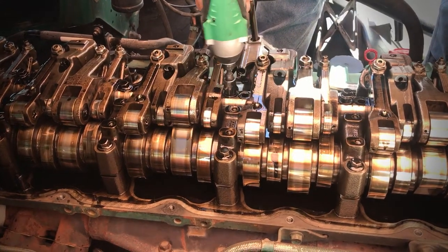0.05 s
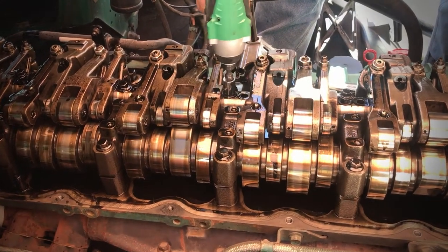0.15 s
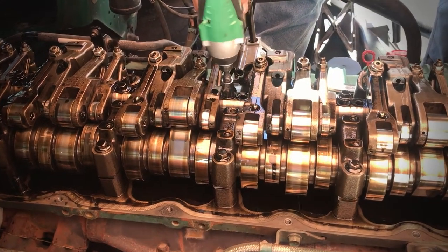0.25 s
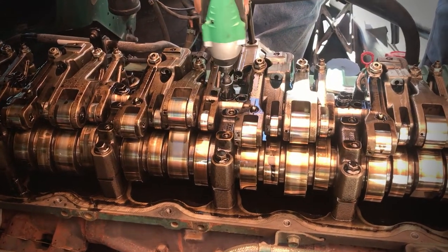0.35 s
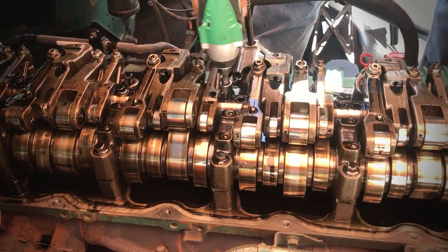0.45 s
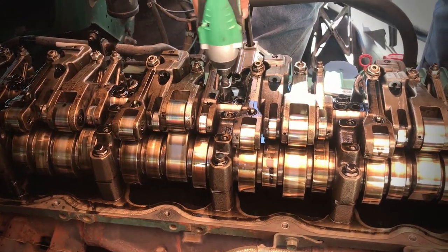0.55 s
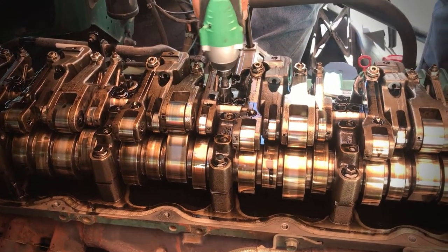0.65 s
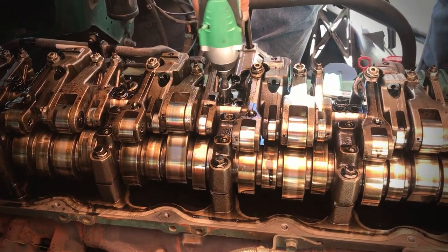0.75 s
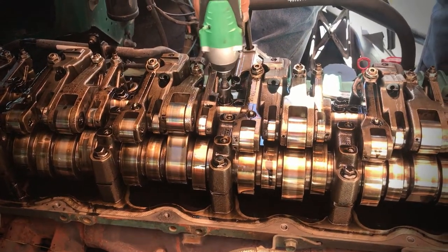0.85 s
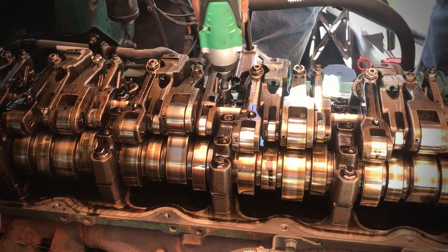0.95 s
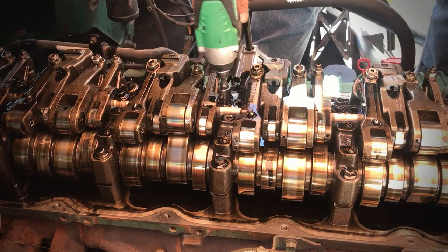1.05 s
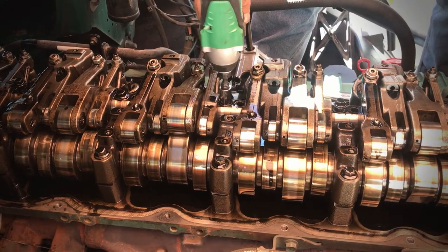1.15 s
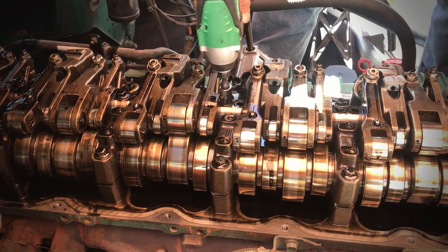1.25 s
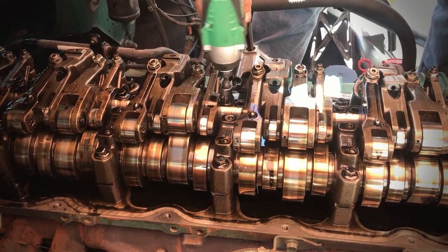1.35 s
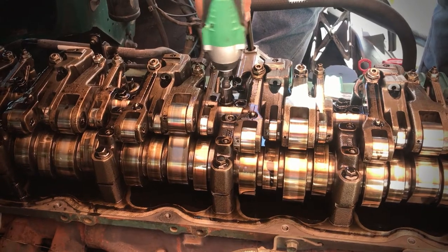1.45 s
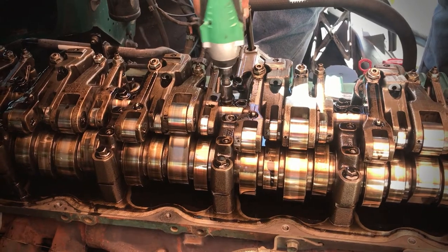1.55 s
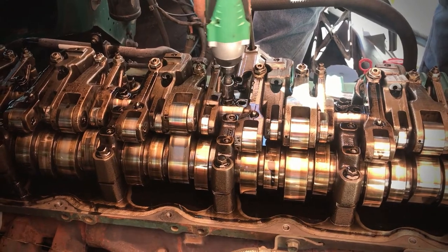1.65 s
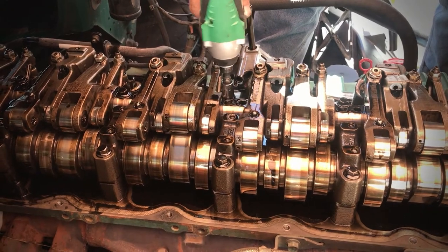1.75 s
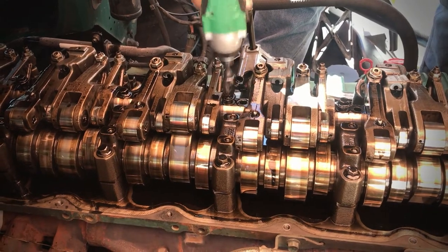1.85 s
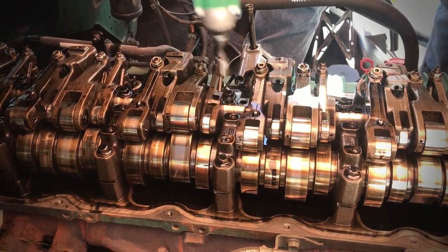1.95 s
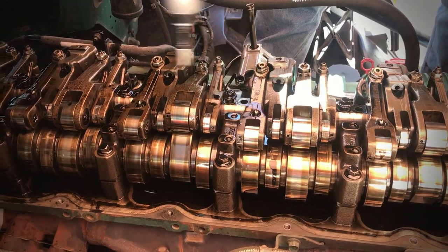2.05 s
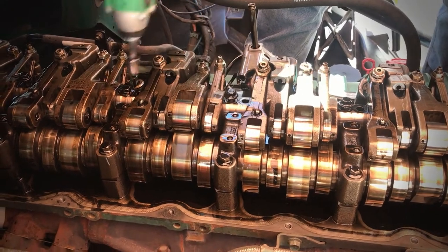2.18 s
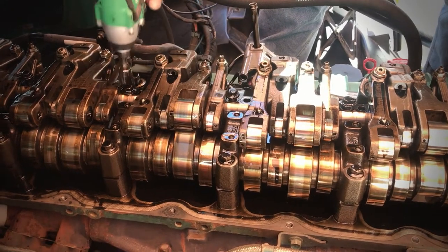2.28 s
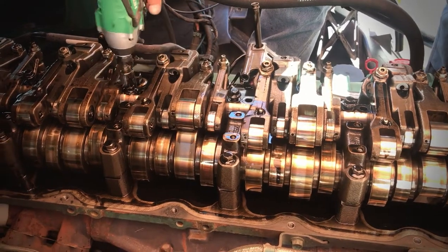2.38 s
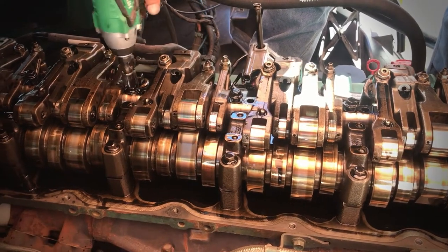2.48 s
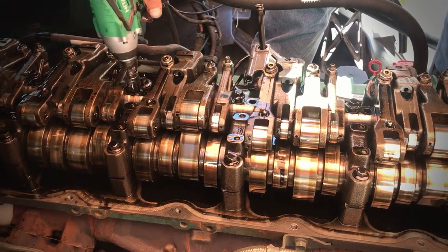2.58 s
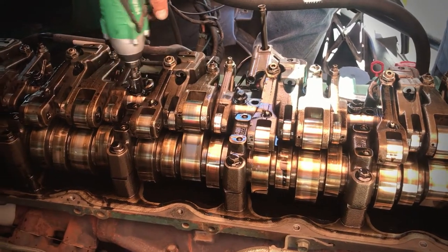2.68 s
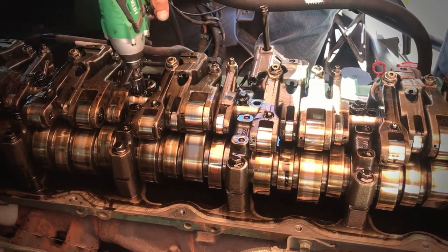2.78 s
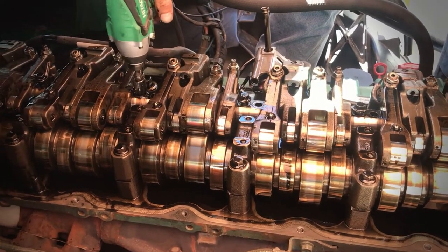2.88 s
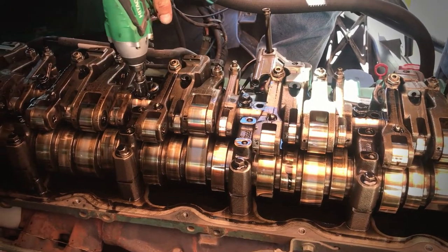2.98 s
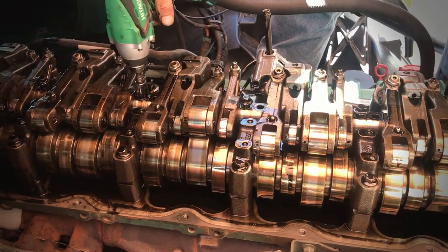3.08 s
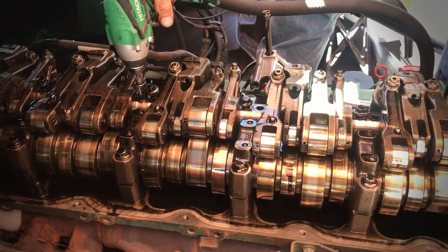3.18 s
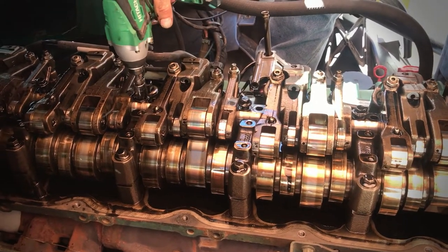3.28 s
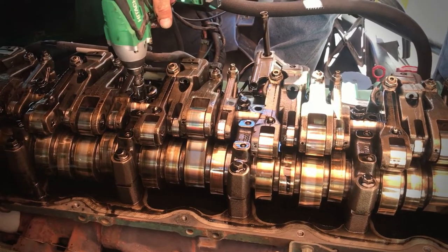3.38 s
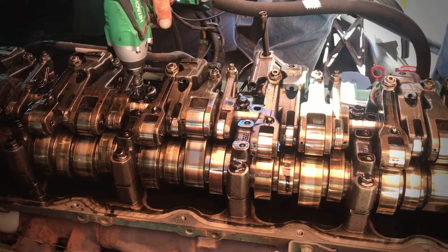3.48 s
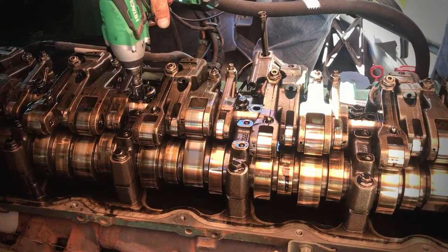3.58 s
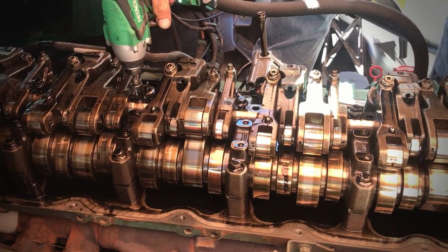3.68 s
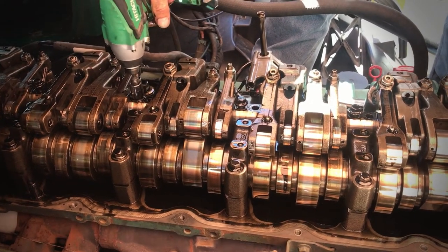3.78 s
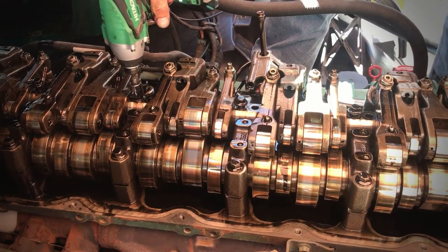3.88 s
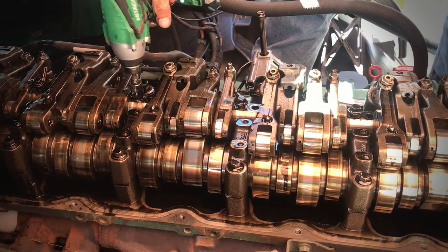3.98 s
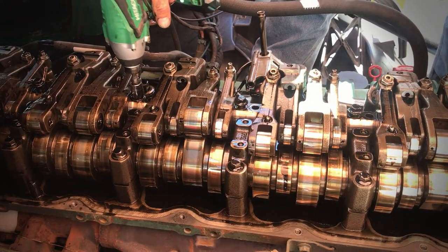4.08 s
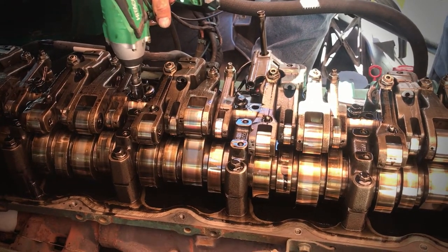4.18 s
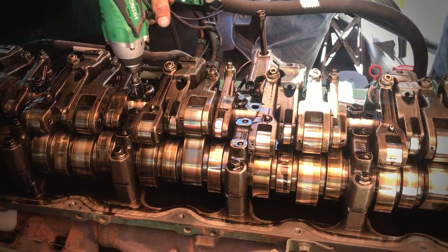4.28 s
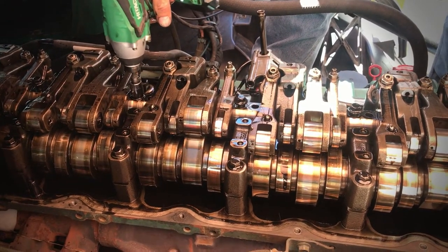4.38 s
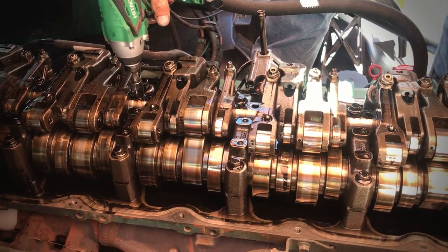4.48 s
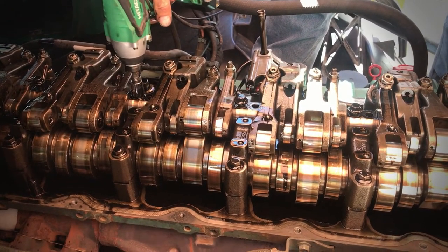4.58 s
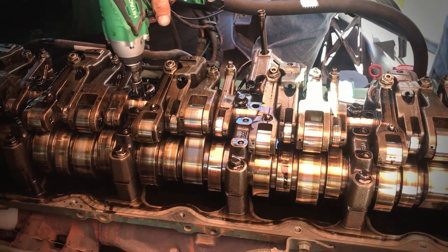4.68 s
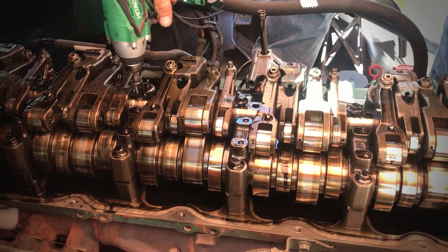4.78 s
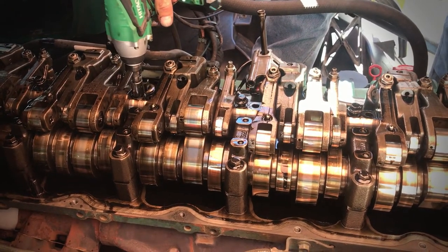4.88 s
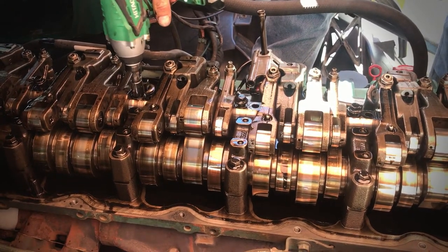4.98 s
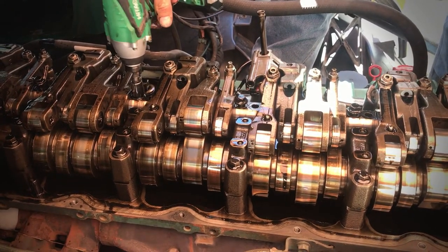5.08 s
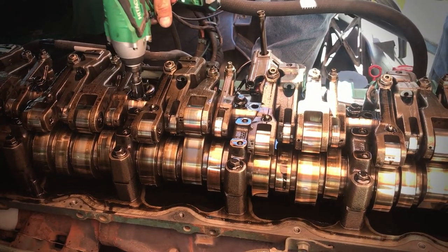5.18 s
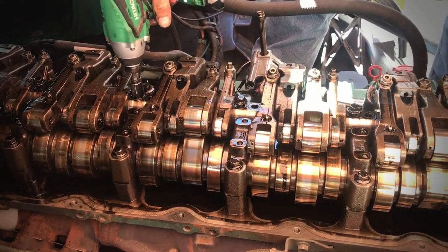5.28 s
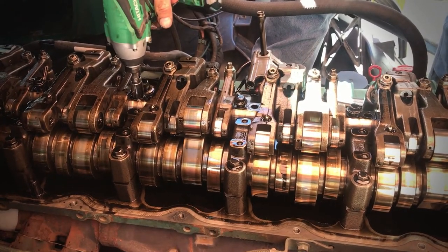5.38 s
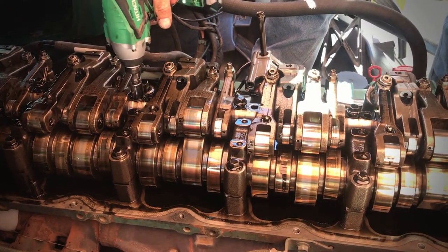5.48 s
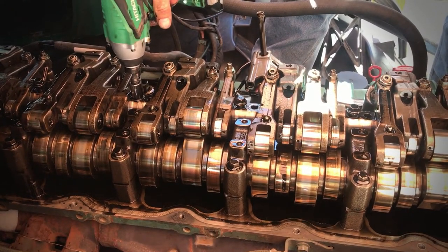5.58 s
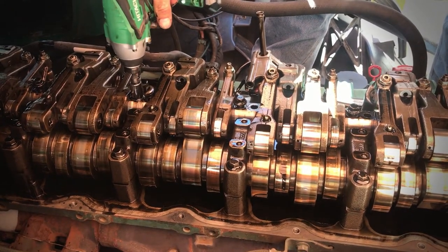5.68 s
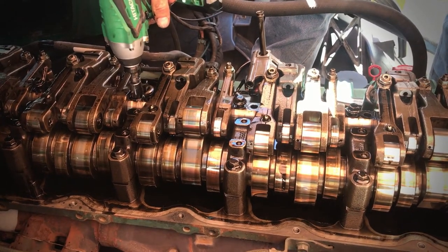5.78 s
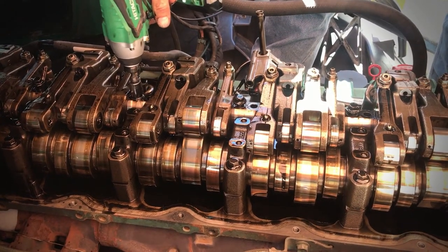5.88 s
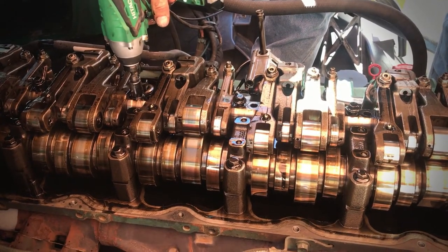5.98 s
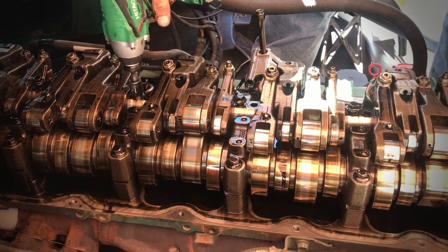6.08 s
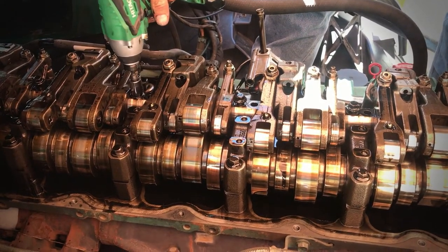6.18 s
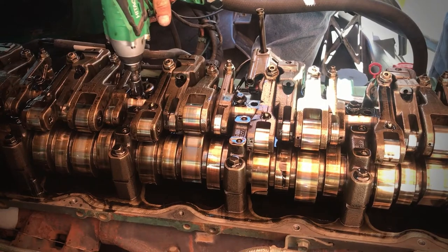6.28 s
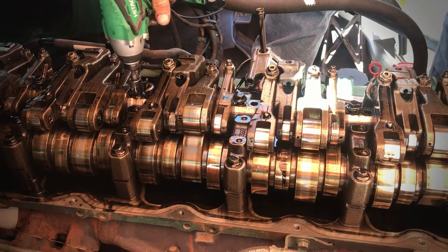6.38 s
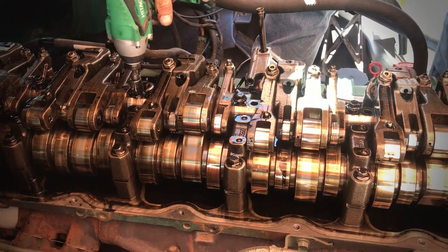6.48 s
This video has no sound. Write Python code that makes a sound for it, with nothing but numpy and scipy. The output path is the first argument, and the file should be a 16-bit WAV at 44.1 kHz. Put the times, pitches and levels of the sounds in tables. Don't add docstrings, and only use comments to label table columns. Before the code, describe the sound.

Steel taps and slowing ticks, then a cordless impact wrench hammers in short rattling bursts, freewheels briefly, and returns with longer metallic hammering runs.

```python
import sys
import numpy as np
from scipy import signal
from scipy.fft import rfft, irfft, next_fast_len
from scipy.io import wavfile
from scipy.ndimage import uniform_filter1d

SR = 44100
rng = np.random.default_rng(int(sys.argv[2]) if len(sys.argv) > 2 else 0)


def output_pcm(signal):
    pcm = np.clip(np.atleast_2d(signal).T, -1, 1) * 32767
    wavfile.write(sys.argv[1], SR, np.round(pcm).astype(np.int16))


def attenuation_scalar(level_db):
    decades = np.asarray(level_db, float) / 20
    return 10 ** decades


N = 288795

# pulled in seconds, released in seconds, motor level in dB,
# casting ring in dB.
PULLS = [(0.28, 0.433, -27, -4.5), (0.532, 0.687, -22, -4), (0.748, 0.935, -22, -6.5),
         (1.023, 1.233, -26.5, -5), (1.283, 1.468, -31, -3.5), (2.809, 2.958, -22.5, -3.5),
         (3.047, 3.26, -20.5, -4.5), (3.327, 3.531, -23.5, -3), (3.538, 4.973, -23, -4.5),
         (5.006, 5.234, -28, -3), (5.288, 5.463, -22.5, -4.5), (5.54, 6.55, -30.5, -4.5)]
# time in seconds, crack in dB, casting ring in dB.
TAPS = [(0.0662, -11.5, 1), (.075, -13, 5), (.0926, -8, 3), (.131, -24, -1), (0.1403, -3.5, -3),
        (1.507, -20, -9), (1.525, -29, -9), (1.7768, -24, -8), (1.78, -18.5, 0.5), (1.8197, -31, -2),
        (1.9305, -26, -5), (2.4573, -20, -24), (2.4671, -22, 1.5), (2.503, -44, -12), (2.562, -51, -10),
        (2.6178, -28, -10), (2.629, -26, -10), (2.639, -37, -1), (2.652, -32, -8), (2.6603, -38, -8),
        (2.6675, -27, 3), (2.6797, -40, 10)]
REPEATS_UNDER_HZ = 900
KNOCK_DULL_DB_PER_OCTAVE, KNOCK_BARE_DB = 5.0, -9.0
BLOW_SPREAD_DB, KNOCK_SPREAD_DB = 1.0, 1.6


def at_hz(points, hz):
    points = np.array(points)
    return np.interp(np.log(hz), np.log(points[:, 0]), points[:, 1])


def in_time(spells, rest_db):
    rows = []
    for spell in spells:
        before, after = (spell[0][0] - .004, rest_db), (spell[-1][0] + 0.0036, rest_db)
        rows += [before] + list(spell) + [after]
    s, level_db = np.transpose(rows)
    return np.interp(np.arange(N) / SR, s, level_db)


def rms_one(x):
    return x / np.sqrt(np.mean(x ** 2) + 1e-20)


def drift(rate):
    r = np.exp(-80 * np.pi * rate / SR)
    white = rng.standard_normal(N // 40 + 2002)
    slow = signal.lfilter([1], [1, -2 * r, r * r], white)[2000:]
    return np.interp(np.arange(N) / 40, np.arange(len(slow)), rms_one(slow))


def filtered(x, order, hz, kind):
    return signal.sosfilt(signal.butter(order, hz, kind, fs=SR, output="sos"), x)


def split(x, hz):
    return [filtered(x, 4, hz, side) for side in ("low", "high")]


def bands(low_hz, count):
    white = rng.standard_normal((2, N))
    edges = np.minimum(low_hz * 2 ** (np.arange(count + 1) / 3), .45 * SR)
    for k, (low, high) in enumerate(zip(edges, edges[1:])):
        yield np.sqrt(low * high), filtered(white[k % 2], 2, [low, high], "band")


def hiss(spectrum, low_hz, count, shared_db, own_db):
    together = shared_db * drift(10.0)
    total = np.zeros(N)
    for hz, noise in bands(low_hz, count):
        total += attenuation_scalar(at_hz(spectrum, hz) + together + own_db * drift(35.0)) * noise
    return rms_one(total)


def coloured(x, spectrum):
    size = next_fast_len(N)
    hz = np.maximum(np.fft.rfftfreq(size, 1 / SR), 1)
    return irfft(rfft(x, size) * attenuation_scalar(at_hz(spectrum, hz)), size)[:N]


def train(at, level):
    return np.bincount(at, level, N)[:N]


def dying(clicks, t60):
    return signal.lfilter([1], [1, -attenuation_scalar(-60 / (t60 * SR))], clicks + 1e-18)


def ring(clicks, hz, t60):
    r, w = attenuation_scalar(-60 / (t60 * SR)), 2 * np.pi * hz / SR
    return signal.lfilter([0, np.sin(w)], [1, -2 * r * np.cos(w), r * r], clicks + 1e-18)


def rumble_db():
    # time in seconds, rumble in dB.
    shop_level = [
        (0, -37),
        (1.5, -37.5),
        (2.8, -38),
        (3.6, -47.5),
        (4.5, -56),
        (5.45, -43),
        (5.6, -33.5),
        (6.55, -57),
    ]
    # centre in seconds, half length in seconds, extra level in dB.
    handling = [
        (0.028, 0.24, 19.5),
        (1.775, 0.12, 8),
        (3.88, .12, 16.5),
    ]
    t = np.arange(N) / SR
    bumps = sum(db * np.maximum(1 - ((t - s) / half_s) ** 2, 0) for s, half_s, db in handling)
    return in_time([shop_level], -40) + bumps


def ducking(tool, knee_db, share):
    over = uniform_filter1d(tool ** 2, size=1800) / attenuation_scalar(2 * knee_db)
    return (1 + over) ** (-share / 2)


def workshop(tool):
    # frequency in Hz, level in dB per Hz.
    air_spectrum = [(30, -19.5), (50, -3), (118, -6), (190, -16.5), (300, -18), (400, -16), (700, -27.5),
                    (1050, -23), (2000, -31), (4000, -35), (8000, -45), (16000, -58)]
    air = hiss(air_spectrum, 35, count=27, shared_db=1.3, own_db=2.0)
    return attenuation_scalar(rumble_db()) * air * ducking(tool, knee_db=-35.0, share=.3)


def thumps(held_s):
    # time in seconds, peak in dB.
    hardest = [(0.3502, -17), (0.6452, -27), (0.8749, -17), (1.1522, -19), (1.4269, -23), (3.1335, -29),
               (3.1556, -22), (3.4796, -21), (4.0593, -29), (4.583, -22), (4.6043, -29), (4.6266, -22),
               (4.9094, -26), (5.1131, -26), (5.1569, -27), (5.7113, -27), (5.9066, -17), (5.9285, -24),
               (5.9503, -26), (5.9721, -25), (6.0582, -24), (6.2229, -24), (6.2881, -25), (6.3093, -20),
               (6.3307, -17), (6.4872, -27)]
    lag_s, every_blow_db = .004, -33.5
    s, level_db = np.transpose(hardest)
    hard_clicks = train(np.round(s * SR).astype(int), attenuation_scalar(level_db - 5.5))
    sway = ring(hard_clicks, hz=52, t60=0.037)
    s = np.append(s, held_s + lag_s)
    level_db = np.append(level_db, every_blow_db + BLOW_SPREAD_DB * rng.standard_normal(len(held_s)))
    thump_clicks = train(np.round((s - .003) * SR).astype(int), attenuation_scalar(level_db + 5.0))
    t = np.arange(900) / SR
    turns, start_s, fade_s = 0.82, 0.00095, 0.0044
    swing = -np.sin(2 * np.pi * turns * np.log(1 + t / start_s)) * np.exp(-t / fade_s)
    return filtered(signal.fftconvolve(thump_clicks, swing)[:N], 2, 45, "high") + sway


def motor():
    # frequency in Hz, level in dB per Hz.
    gear_spectrum = [(300, -32.5), (600, -17.5), (1300, 1), (2300, -9.5), (3000, -5), (4300, -4.5),
                     (5200, -10.5), (9000, -13), (16000, -20)]
    # start, loud from, loud until and end in seconds,
    # whirr in dB.
    sliding = [
        (0, .04, .13, .27, -28),
        (1.775, 1.8, 1.81, 1.85, -42),
        (2.2, 2.24, 2.26, 2.36, -43),
        (2.61, 2.64, 2.695, 2.74, -38),
        (2.785, 2.8, 2.82, 2.84, -48),
        (5.42, 5.52, 5.59, 5.62, -41),
    ]
    # time in seconds, whirr in dB.
    free_spin = [
        (1.53, -44),
        (1.56, -26.5),
        (1.62, -23.5),
        (1.66, -20.5),
        (1.7, -23),
        (1.73, -37),
        (1.77, -56),
    ]
    edge_db, still_db = -58.0, -61.0
    slides = [[(a, edge_db), (b, db), (c, db), (d, edge_db)] for a, b, c, d, db in sliding]
    rise_s, fall_s = 0.028, 0.064
    loaded = [[(on, db - 38.0), (on + rise_s, db), (off, db), (off + fall_s, db - 29.0)]
              for on, off, db, _ in PULLS]
    unloaded_db = in_time(sorted(slides + [free_spin]), still_db)
    turning_db = np.maximum(unloaded_db, in_time(loaded, still_db))
    return attenuation_scalar(turning_db) * hiss(gear_spectrum, 400, count=17, shared_db=.5, own_db=1.0)


def whine():
    # time in seconds, pitch in Hz, level in dB.
    spin_pitch = [
        (1.545, 700, -55),
        (1.565, 960, -40),
        (1.585, 1260, -35),
        (1.62, 1480, -33),
        (1.645, 1540, -33),
        (1.67, 1330, -34),
        (1.7, 1120, -38),
        (1.73, 1000, -60),
    ]
    s, hz, level_db = np.transpose(spin_pitch)
    t = np.arange(N) / SR
    unsteady_hz = np.interp(t, s, hz) * (1 + .02 * drift(60.0))
    turn = 2 * np.pi * np.cumsum(unsteady_hz) / SR
    driven = uniform_filter1d(1.0 * (t < s[np.argmax(hz)]), size=900) * attenuation_scalar(3 * drift(50.0))
    second = attenuation_scalar(-10.0) * np.sin(2 * turn)
    upper = attenuation_scalar(-1.0) * (np.sin(3 * turn) + .5 * np.sin(4 * turn))
    tone = np.sin(turn) + driven * (second + upper)
    return attenuation_scalar(np.interp(t, s, level_db, -120, -120) + 2.0 + 4.0 * drift(70.0)) * tone


def streaks(table, gap_s):
    most_blows, scatter_s = 12, .0002
    first, last, blow_db, knock_db = np.transpose(table)[:, :, None]
    gaps, k = np.round((last - first) / gap_s), np.arange(most_blows)
    luck = rng.standard_normal((len(table), most_blows, 3))
    s = first + (last - first) * k / gaps + scatter_s * luck[..., 0]
    blow_db = blow_db + BLOW_SPREAD_DB * luck[..., 1]
    knock_db = knock_db + KNOCK_SPREAD_DB * luck[..., 2]
    return [v[k <= gaps] for v in (s, blow_db, knock_db)]


def blows():
    # first blow in seconds, last blow in seconds, blow in dB, take-up knock in dB.
    holding = [(.347, .369, 0, -29), (.4058, .4255, -11, -5), (.595, .7085, -6, -8),
               (.8248, .918, -7.5, -2.5), (1.103, 1.1738, -7, -2.5), (1.350, 1.4235, -5, -12.5),
               (2.893, 2.937, -5.5, -4.5), (3.108, 3.174, -3.5, -4.5), (3.4122, 3.4763, -4.5, -7),
               (3.7325, 3.7538, 0, -18.5), (3.9079, 3.9303, -5.5, -22), (4.034, 4.079, -6, -5),
               (4.359, 4.4464, -9, -6), (4.5357, 4.622, -6, -12.5), (4.7565, 4.928, -9.5, -5.5),
               (5.086, 5.1745, -6.5, -5.5), (5.361, 5.4262, -6, -4.5), (5.6216, 5.7082, -3, -9.5),
               (5.9022, 6.119, -7.5, -6.5), (6.197, 6.327, -5.5, -8), (6.3512, 6.3968, -11, -9.5),
               (6.419, 6.4838, -5.5, -18.5)]
    slipping = [(1.202, 1.228, -14.5, -13.5), (3.2006, 3.2552, -7.5, -7.5), (3.4998, 3.558, -6, -7),
                (3.608, 3.632, -9.5, -39), (3.6517, 3.6796, -9.5, -30), (3.789, 3.8755, -7, -7),
                (3.9585, 4.0138, -3.5, -5.5), (4.102, 4.152, -4.5, -20.5), (4.2526, 4.335, -4, -8.5),
                (4.4787, 4.5116, -1.5, -27), (4.649, 4.703, -7.5, -15), (5.7325, 5.7893, -6, -8.5),
                (5.856, 5.881, -2.5, -34.5), (6.1483, 6.1739, -7.5, -17), (6.5115, 6.5384, -12.5, -5.5)]
    return streaks(holding, gap_s=.022), streaks(slipping, gap_s=.0275)


def hammer(held, slipped):
    # time in seconds, crack in dB.
    lone_blows = [(.3535, -6.5), (0.5627, -2.5), (0.5843, -3.5), (.801, -1.5), (1.071, -5), (1.08, -10.5),
                  (1.2122, -5), (1.4732, -14.5), (2.871, -2), (2.9496, -8), (3.083, -1.5), (3.3852, -1),
                  (3.702, -1), (4.1787, -5.5), (4.1897, -4), (4.2242, -8.5), (4.732, -7), (4.948, -4.5),
                  (4.957, -5), (5.055, -6), (5.067, -7), (5.1993, -10.5), (5.2074, -8.5), (5.222, -9.5),
                  (5.337, -4), (5.4592, -7), (5.5982, -1), (5.8184, -10), (5.8344, -19)]
    # time in seconds, crack in dB.
    take_up = [(0.3066, -9.5), (.325, -3.5), (0.779, -16), (1.04, -19), (1.0613, -7.5), (1.33, -8),
               (2.8502, -7.5), (3.06, -19), (3.072, -17), (3.3613, -10), (3.7225, 0.5), (5.046, -22),
               (5.2926, -26), (5.3198, -6.5), (5.328, -11.5), (5.553, -24), (5.5782, -6), (5.589, -3)]
    knock_lead_s, scatter_s = 0.0081, .0006
    chatter_lag_s, chatter_db = .0035, -4
    bounce_lag_s, bounce_db = .0065, -10.0
    s, blow_db, knock_db = np.hstack([held, slipped])
    luck = rng.standard_normal((len(s), 5)).T
    knock_s = s - knock_lead_s + scatter_s * luck[0]
    chatter_s = knock_s + chatter_lag_s + scatter_s * luck[1]
    bounce_s = s + bounce_lag_s + scatter_s * luck[3]
    k = np.arange(8)
    coast_gaps_s = .0128 * 1.05 ** k
    coast_s = .1657 + np.cumsum(coast_gaps_s) - coast_gaps_s
    soft = [(knock_s, knock_db),
            (chatter_s, knock_db + chatter_db + KNOCK_SPREAD_DB * luck[2]),
            (bounce_s, blow_db + bounce_db + KNOCK_SPREAD_DB * luck[4]),
            np.transpose(take_up)]
    singles = np.transpose(lone_blows + [row[:2] for row in TAPS])
    hard = [(s, blow_db), singles, (coast_s, -15.0 - 1.8 * k)]
    s, crack_db = np.hstack(soft + hard)
    return s, crack_db, np.arange(len(s)) < np.hstack(soft).shape[1]


def contacts(s, crack_db, soft):
    count, under_db, spread_db, within_s = 2, -13.0, 3.0, .014
    late_s = s[:, None] + 0.001012 + within_s * rng.random((len(s), count))
    late_db = crack_db[:, None] + under_db + spread_db * rng.standard_normal((len(s), count))
    at = np.round(np.append(s, late_s) * SR).astype(int)
    return np.minimum(at, N - 1), np.append(crack_db, late_db), np.append(soft, np.repeat(soft, count))


def cracks(at, crack_db):
    clicks = train(at, attenuation_scalar(crack_db + 3.5) * rng.choice([-1, 1], len(at)))
    return filtered(clicks, 2, 1500, "high")


def treble_octaves(hz):
    return np.log2(max(hz, 4000) / 4000)


def modes(at, crack_db, soft):
    # frequency in Hz, level in dB, t60 in seconds.
    resonances = [(415, -33.5, 0.19), (707.4, -26.5, 0.12), (956.5, -10.5, 0.019), (1108, -16, 0.12),
                  (1246, -11.5, 0.04), (1470, -31, 0.028), (1684, -11, 0.02), (2825, -29, 0.054),
                  (3757, -12.5, 0.025), (4070, -10, 0.026), (4504, -10.5, 0.023), (5510, -33, 0.024),
                  (9280, -8, 0.0031), (12040, -6.5, .011)]
    out = np.zeros(N)
    for hz, level_db, t60 in resonances:
        dull_db = KNOCK_DULL_DB_PER_OCTAVE * soft * treble_octaves(hz)
        size = attenuation_scalar(crack_db - dull_db + level_db + 1.0 * rng.standard_normal(len(at)))
        sign = rng.choice([-1, 1], len(at)) if hz > REPEATS_UNDER_HZ else 1
        out += ring(train(at, size * sign), hz, t60)
    return out


def struck(at, crack_db, soft):
    # frequency in Hz, level in dB per Hz.
    steel_spectrum = [(300, -21.5), (600, -19), (800, -13.5), (960, -3.5), (1250, -2), (1480, -8.5),
                      (1720, -5.5), (2200, -12), (2850, -10.5), (4150, -10), (5600, -8.5), (7600, -10),
                      (9600, -4.5), (16000, -9)]
    # frequency in Hz, t60 in seconds.
    steel_t60 = [(500, 0.13), (1800, 0.062), (5000, 0.059), (13000, 0.032)]
    colour_db, dull, tail_db = 1.8, 0.75, -10.0
    fast, slow, rise_cycles = .17, 1.41, 2.6
    out, click = np.zeros(N), np.eye(1, 5000)[0]
    for hz, noise in bands(303.4, count=18):
        slope_db = dull * np.minimum(crack_db + 18.5, 0) - KNOCK_DULL_DB_PER_OCTAVE * soft
        weak_db = slope_db * treble_octaves(hz)
        size = attenuation_scalar(crack_db + weak_db + colour_db * rng.standard_normal(len(at)))
        t60 = at_hz(steel_t60, hz) / 2
        lag = np.exp(-hz / (rise_cycles * SR))
        power = click if hz < REPEATS_UNDER_HZ else train(at, size ** 2)
        power = dying(power, t60 * fast) + attenuation_scalar(2 * tail_db) * dying(power, t60 * slow)
        sound = np.sqrt(signal.lfilter([1 - lag], [1, -lag], power)) * noise[-len(power):]
        if hz < REPEATS_UNDER_HZ:
            sound = signal.oaconvolve(train(at, size), sound)[:N]
        out += sound
    return attenuation_scalar(14.5) * coloured(out, steel_spectrum)


def casting_db():
    s, ring_db = np.transpose(sorted([(row[0], row[-1]) for row in PULLS + TAPS]))
    latest = np.maximum(np.searchsorted(s, np.arange(N) / SR + .002) - 1, 0)
    return uniform_filter1d(ring_db[latest], size=100)


def ringing_work(at, crack_db, soft):
    work = struck(at, crack_db, soft) + modes(at, crack_db, soft)
    castings, socket = split(work, 2300)
    shank = split(split(socket, 3100)[1], 4130)[0]
    socket = socket + shank * np.where(np.arange(N) < 2 * SR, .6, 0)
    return socket + castings * attenuation_scalar(casting_db())


def scene():
    held, slipped = blows()
    at, crack_db, soft = contacts(*hammer(held, slipped))
    work = ringing_work(at, crack_db, soft)
    tool = work + cracks(at, crack_db + KNOCK_BARE_DB * soft) + motor() + whine()
    return (tool + thumps(held[0]) + workshop(tool))[None]


def top_cut(x):
    return signal.sosfilt(signal.butter(12, 16460, fs=SR, output="sos"), x)


def record(dry):
    heard = filtered(dry, 2, 38, "high")
    heard = .45 * heard + .55 * signal.lfilter(*signal.iirnotch(10500, 9.0, SR), heard)
    held = 0.94 * np.tanh(heard / 1.15)
    top_hz = 15650
    cut = signal.sosfilt(signal.cheby2(12, 55, top_hz * 1.03, fs=SR, output="sos"), held)
    return top_cut(np.clip(cut, -1, 1))


dry = scene()
out = record(dry)
output_pcm(out)
```